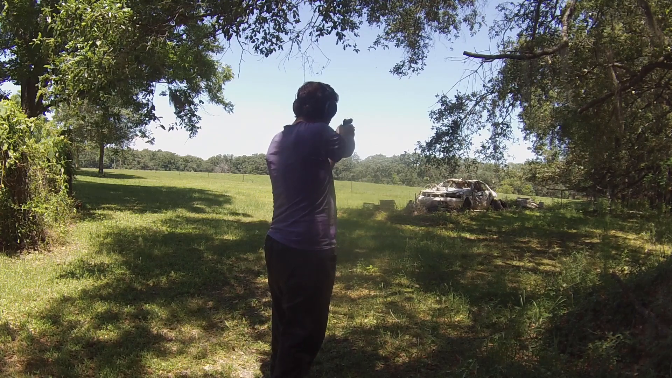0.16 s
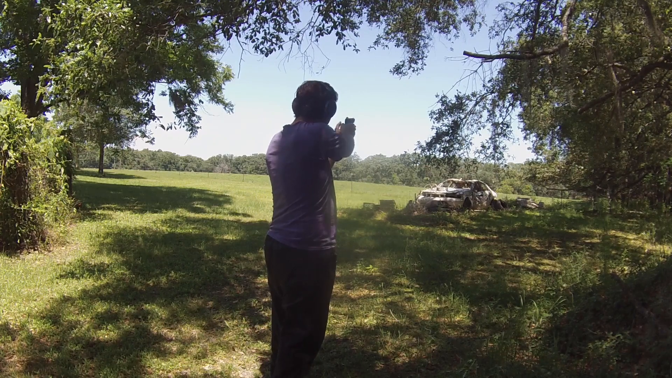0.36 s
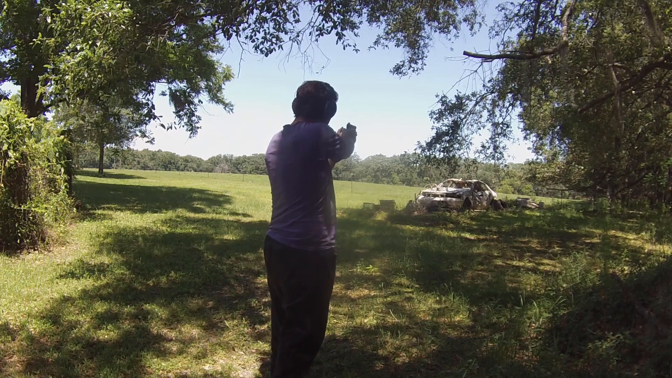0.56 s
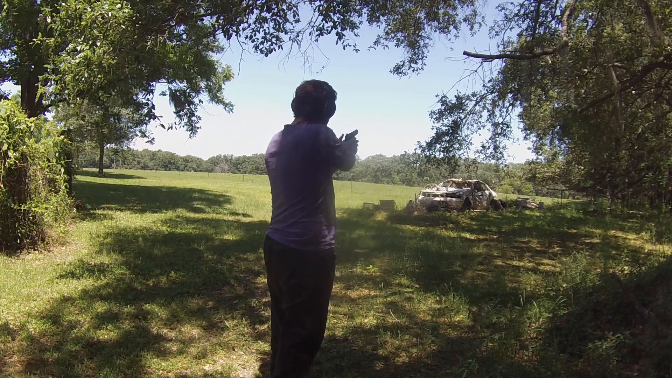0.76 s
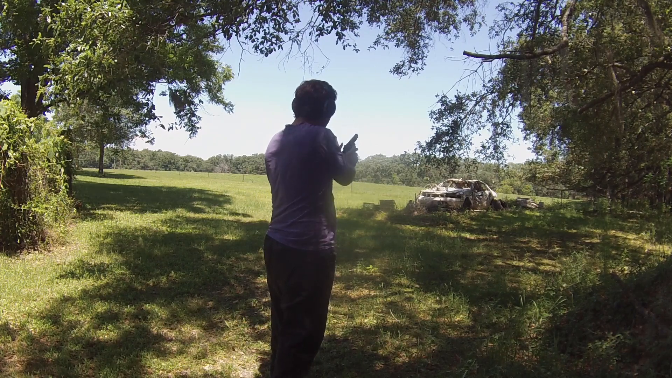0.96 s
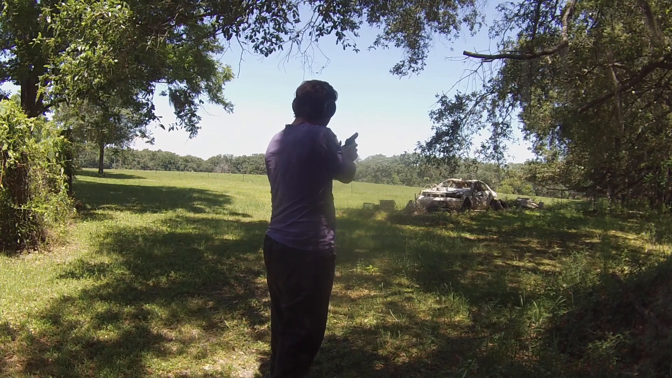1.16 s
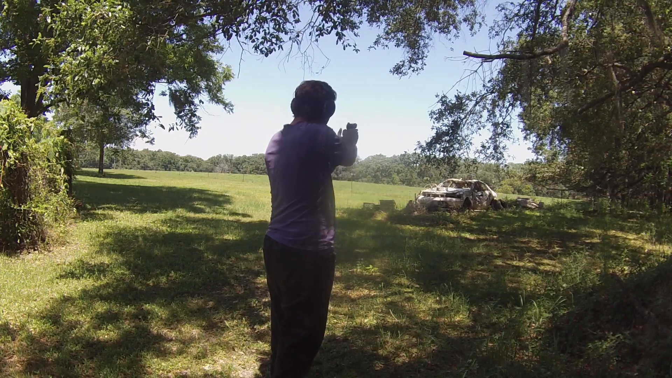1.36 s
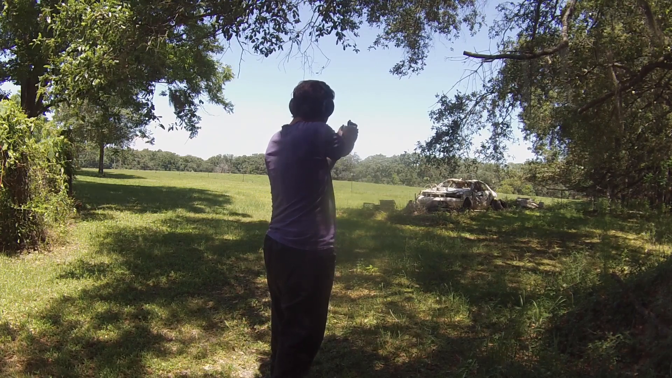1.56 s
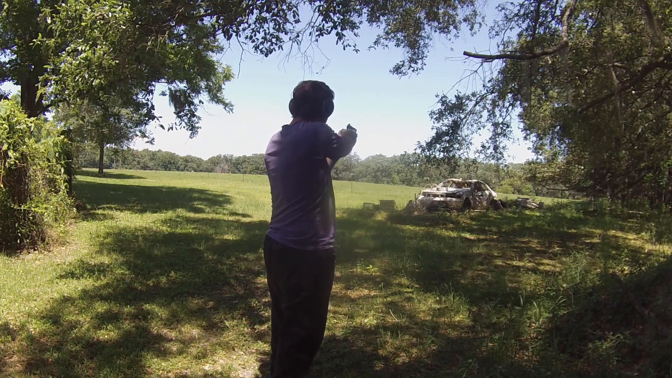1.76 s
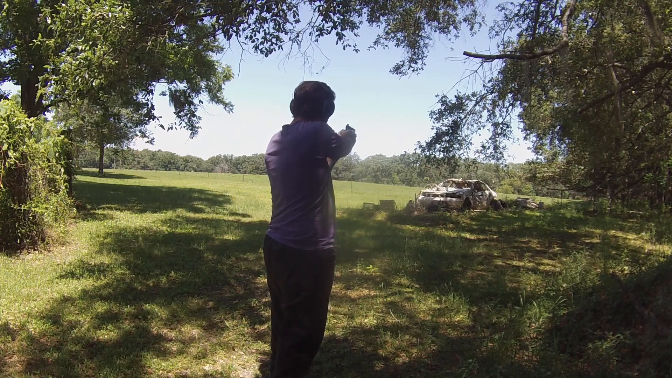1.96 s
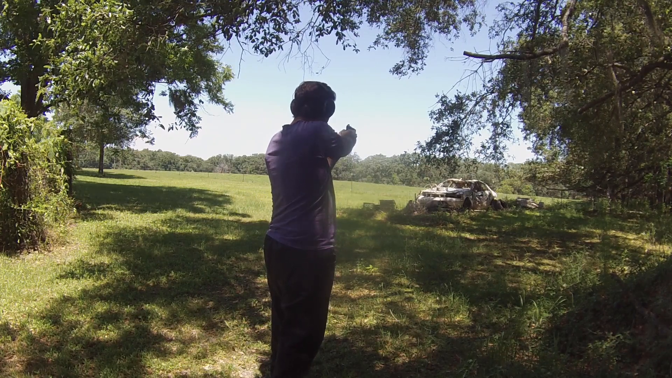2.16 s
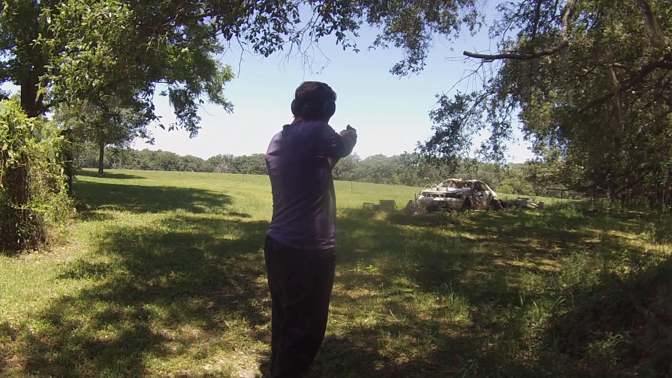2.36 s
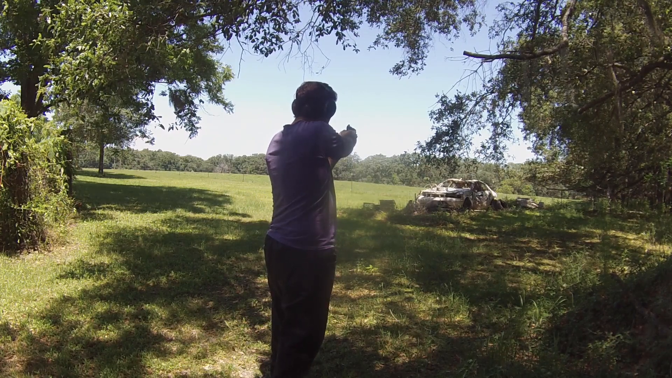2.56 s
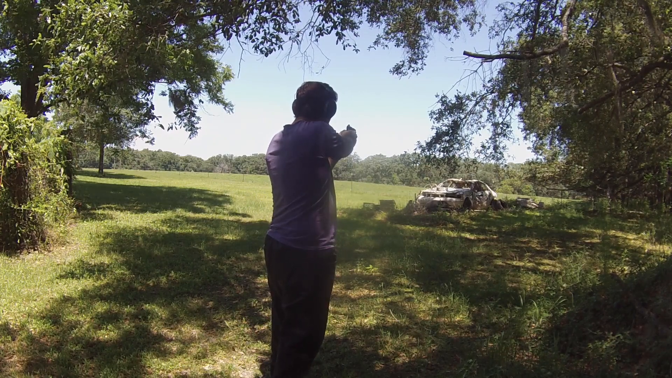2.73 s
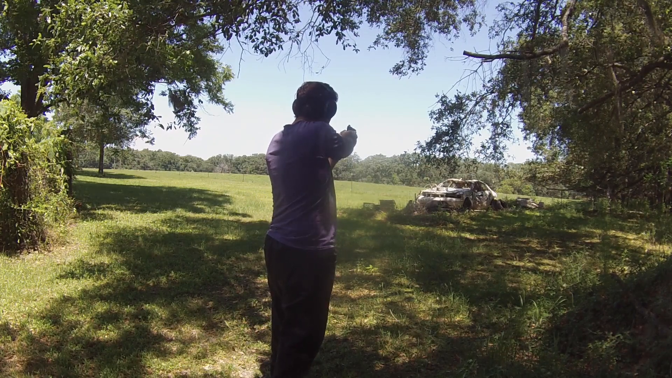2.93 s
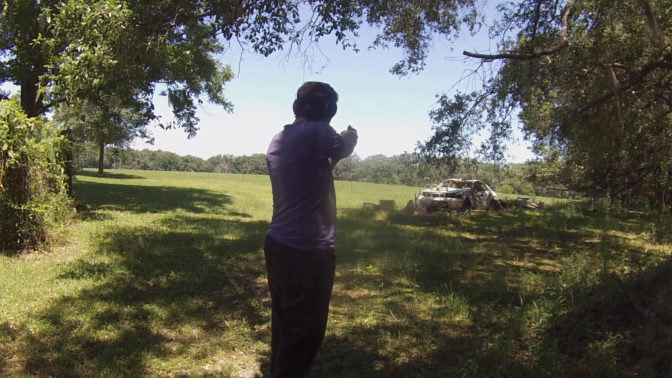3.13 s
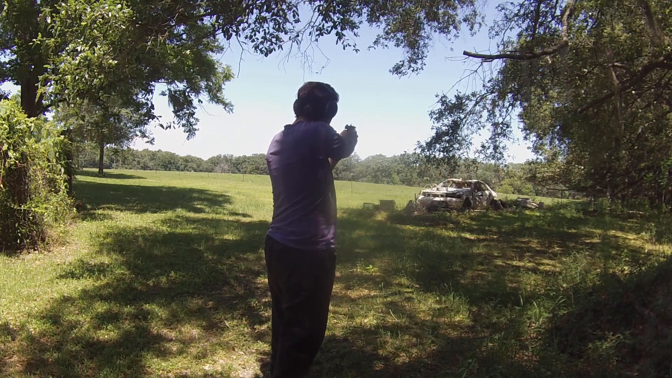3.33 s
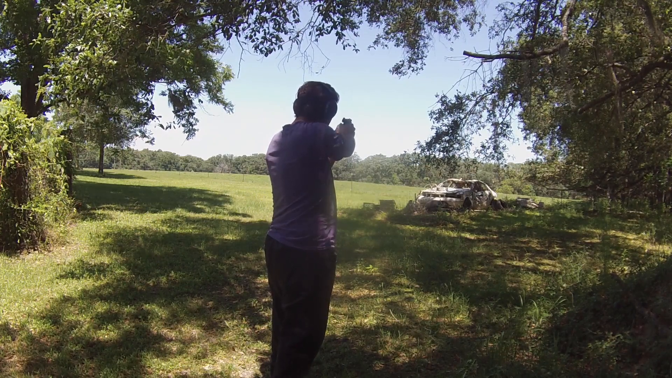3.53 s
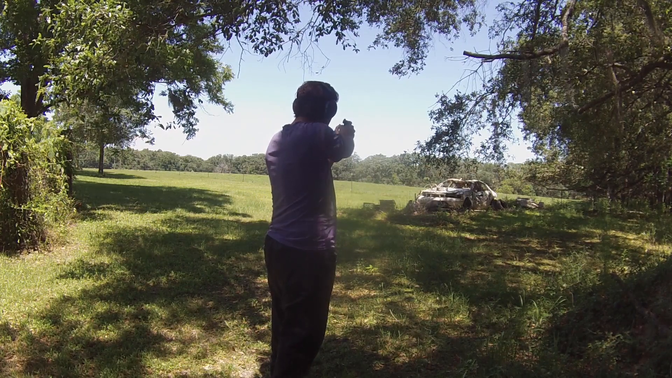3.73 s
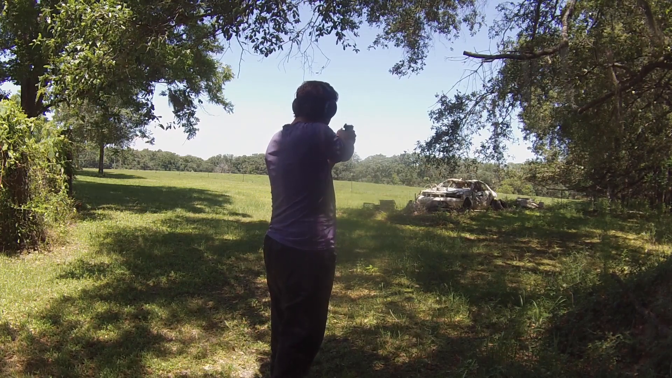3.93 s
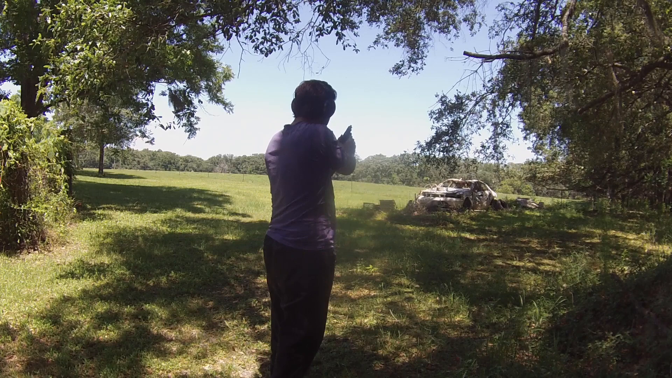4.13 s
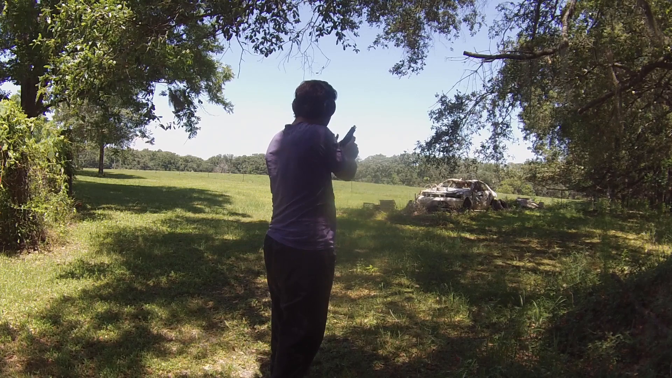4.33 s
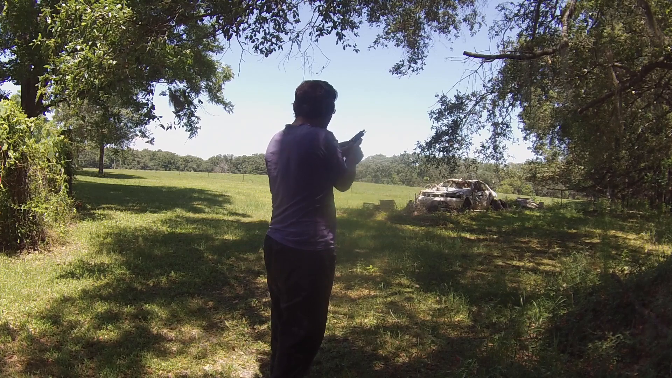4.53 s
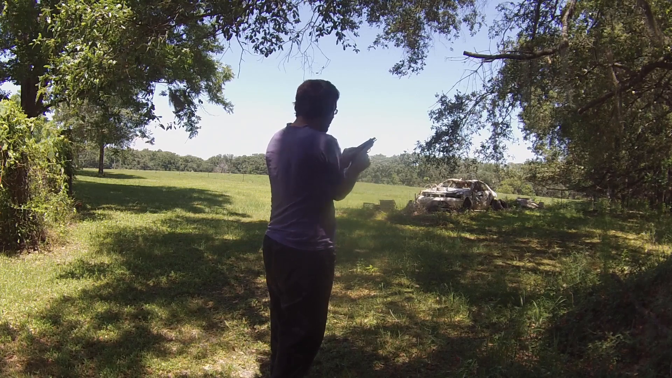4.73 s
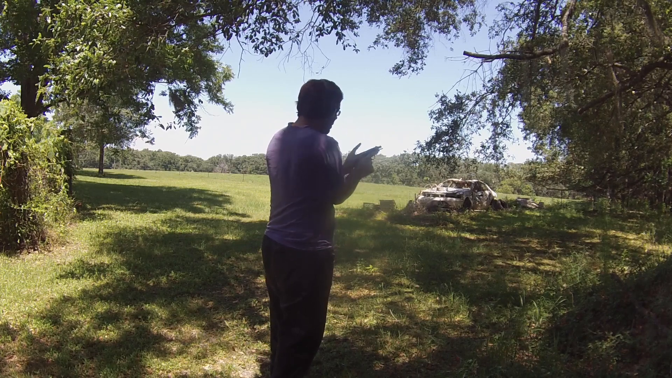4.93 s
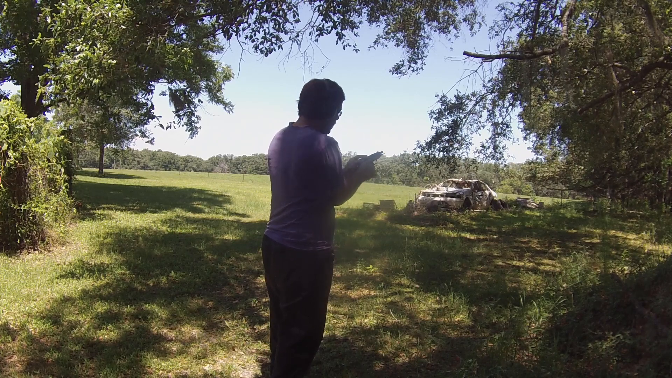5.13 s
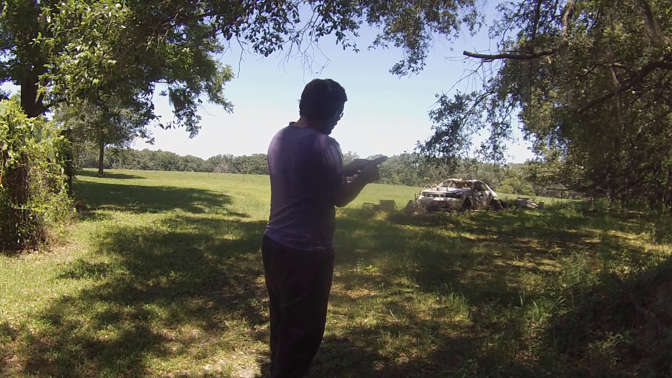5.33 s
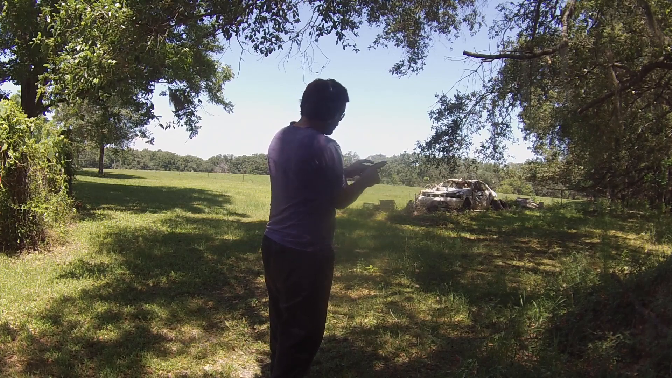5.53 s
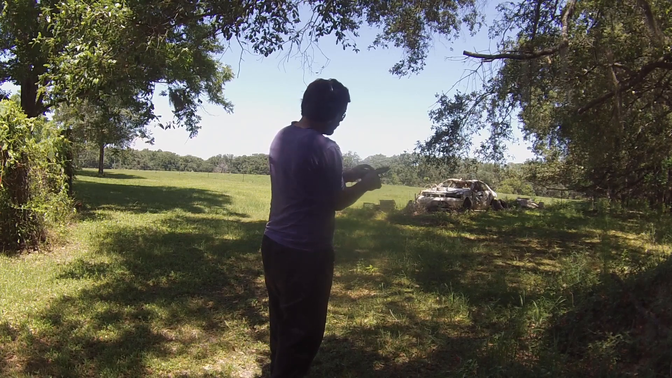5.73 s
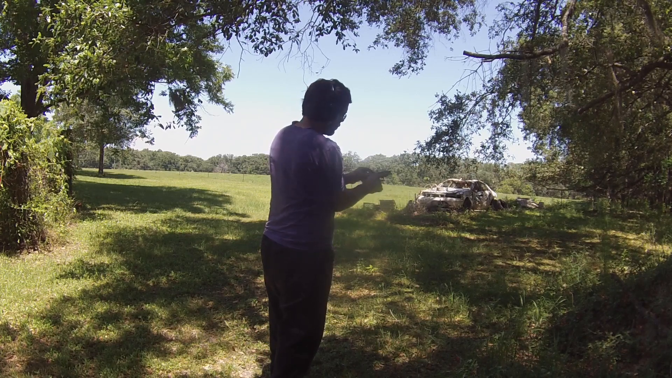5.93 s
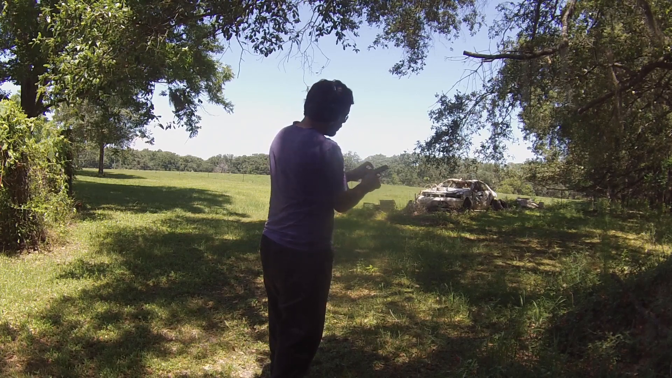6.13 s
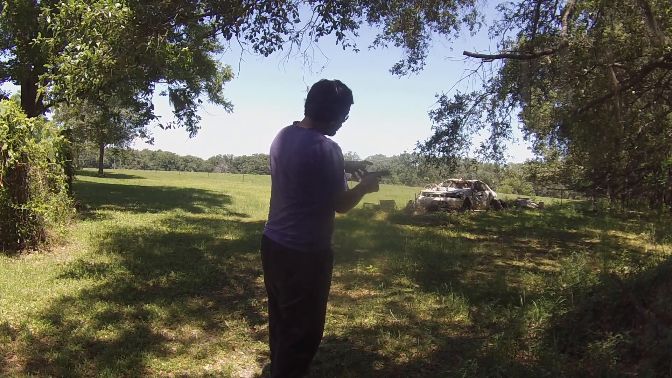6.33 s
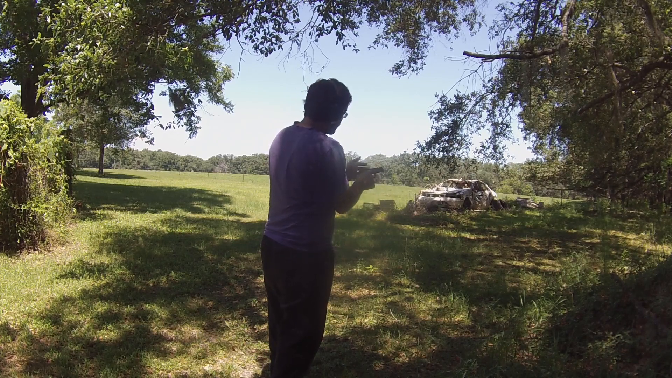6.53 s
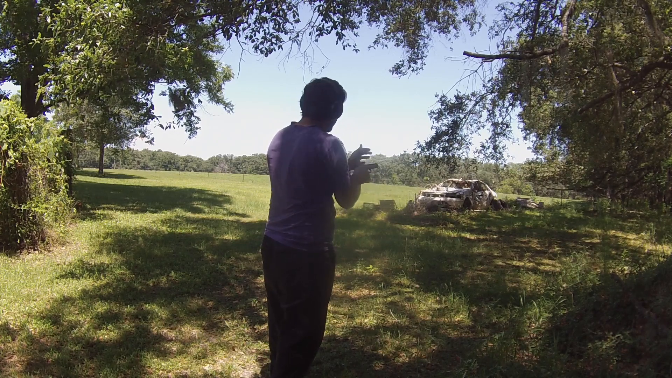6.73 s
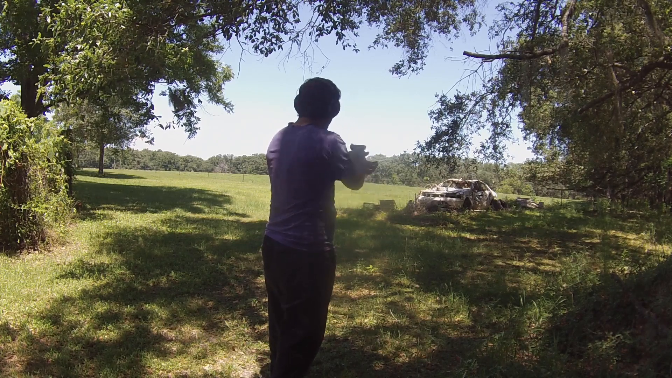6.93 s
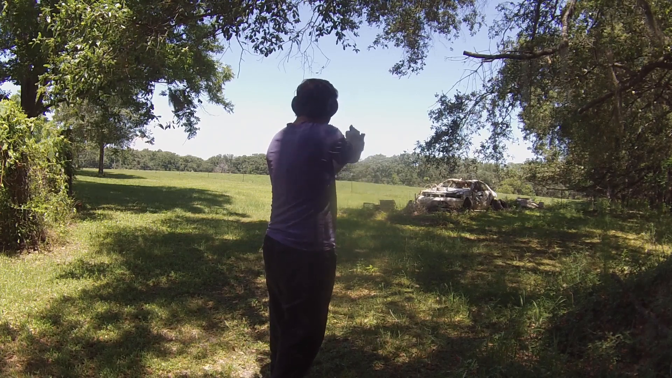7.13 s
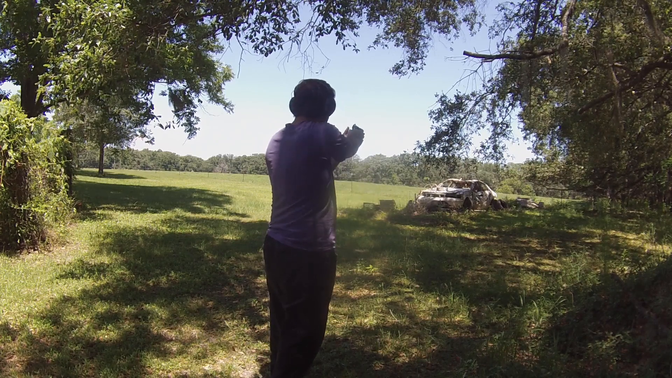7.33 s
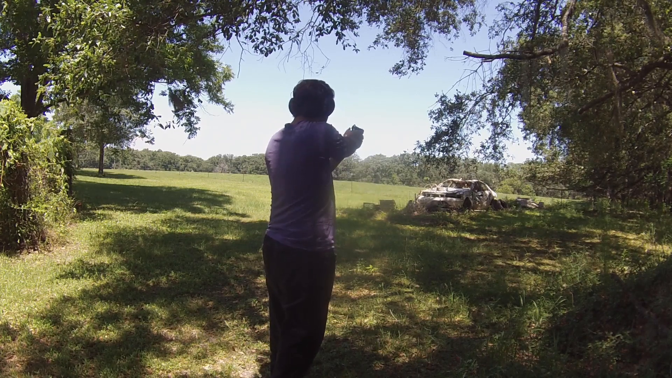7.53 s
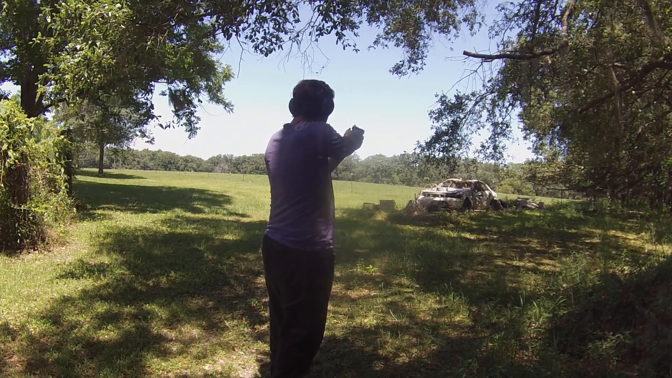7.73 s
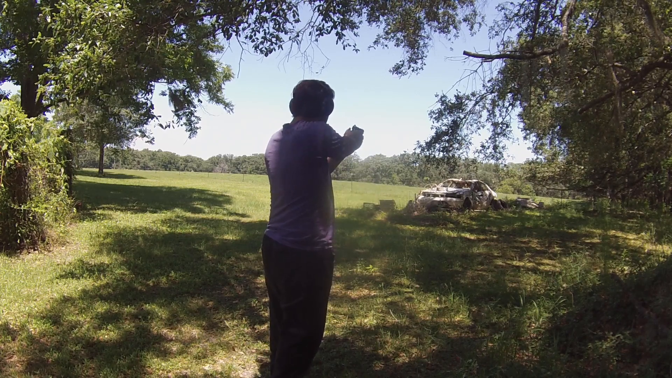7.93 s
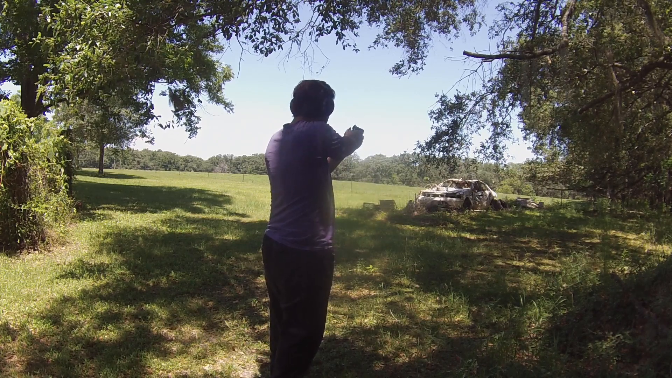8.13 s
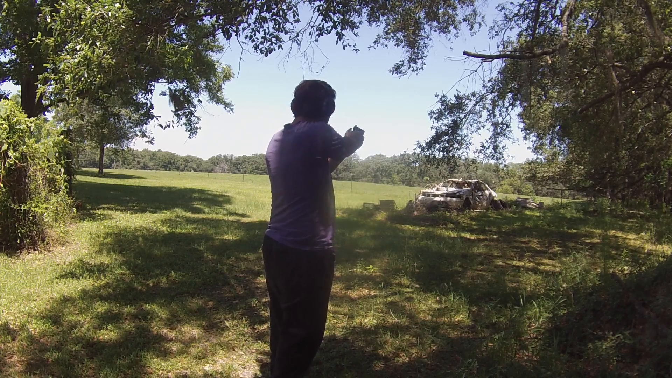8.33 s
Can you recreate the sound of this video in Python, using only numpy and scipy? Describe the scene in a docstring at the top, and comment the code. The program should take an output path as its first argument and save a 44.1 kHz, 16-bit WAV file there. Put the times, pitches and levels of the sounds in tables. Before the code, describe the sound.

Open field edge under trees, close microphone, nearly mono. Two single handgun shots, at the start and about three seconds later, each a saturated bang with heavy low push, quick leafy splashes and a long woodland roll. A dry click sounds between them; after the second come a firm double click and later a cluster of metal clacks. Soft wind buffets drop away, leaving quiet air, thin insect buzz and tiny high bird notes.

```python
"""Edge of a field, under trees: two pistol shots a few metres from a microphone whose inputs they overload.
Each shot is a noise crack plus a huge pressure push; leaves and trunks scatter it back as shaped noise, then
the woods around the field roll on, ever duller. The gun clicks, as damped noise, when handled. Narrow noise
makes the insects, brief wavering sines the thin high tones, a wandering sine the far motor; low noise in gusts
is light wind bumping the microphone."""
import sys
import numpy as np
from scipy import signal
from scipy.fft import rfft, irfft, next_fast_len
from scipy.io import wavfile
from scipy.ndimage import map_coordinates

SR = 44100
rng = np.random.default_rng(int(sys.argv[2]) if len(sys.argv) > 2 else 0)


def file_out(sig):
    """Save sig as 16-bit WAV at sys.argv[1]."""
    # one column per channel
    cols = np.atleast_2d(sig).T
    # limit, then scale
    lim = np.clip(cols, -1, 1)
    pcm = np.round(lim * 32767).astype(np.int16)
    wavfile.write(sys.argv[1], SR, pcm)


N = 369558


def amp(db):
    """Decibels to gain."""
    return 10 ** (np.asarray(db) / 20)


def unit(x):
    """Scale to rms 1."""
    return x / np.sqrt(np.mean(x ** 2) + 1e-20)


def along(points, hz):
    """Read (frequency [Hz], value) points on a log-frequency axis."""
    f, v = np.transpose(points)
    return np.interp(np.log(hz + 1), np.log(f + 1), v)


def filtered(x, response):
    """Multiply the spectrum of x by a response of frequency [Hz]."""
    n = x.shape[-1]
    padded = next_fast_len(n + 8192)
    spectrum = rfft(x, padded) * response(np.fft.rfftfreq(padded, 1 / SR))
    return irfft(spectrum, padded)[..., :n]


def noise(colour, n):
    """Noise of rms 1, coloured by a (frequency [Hz], level [dB]) table."""
    return unit(filtered(rng.standard_normal(n), lambda f: amp(along(colour, f))))


def band(hz, width_hz):
    """Narrow noise of rms 1, 3.5 dB down at width_hz either side of the centre."""
    return unit(filtered(rng.standard_normal(N), lambda f: 1 / (1 + ((f - hz) / width_hz) ** 2 / 2)))


def wobble(knots_per_s, n=N):
    """Smooth random curve through normally distributed knots."""
    knots = rng.standard_normal(N // 8)
    return map_coordinates(knots, [np.arange(n) * knots_per_s / SR], mode="mirror")


def lobe(t, start_s, length_s):
    """Half a sine, zero elsewhere."""
    return np.abs(np.sin(np.pi * np.clip((t - start_s) / length_s, 0, 1)))


def bump(t, centre_s, spread_s):
    """Bell-shaped swell; spread_s is its standard deviation."""
    return np.exp(-.5 * ((t - centre_s) / spread_s) ** 2)


def add(track, s, sound):
    """Mix a sound in at time s."""
    place = track[max(round(s * SR), 0):][:len(sound)]
    place += sound[:len(place)]


# open-air colour: (frequency [Hz], level [dB])
AIR_COLOUR = [(12, -11), (22, -0.5), (60, -4.5), (110, -10.5), (270, -16), (500, -19.5), (900, -24.5),
              (1800, -28), (4000, -34), (8500, -41.5), (10500, -41.5), (11500, -45.5), (13000, -48.5),
              (15500, -59)]


def field(air_db=-54.0, hum_hz=87, hum_db=-60):
    """Open-air noise plus a far motor: a sine of wandering pitch and level."""
    pitch_hz = hum_hz + 1.8 * wobble(4)
    tone = unit(np.sin(2 * np.pi * np.cumsum(pitch_hz) / SR))
    hum = amp(hum_db + 1.1 * wobble(2)) * tone
    return amp(air_db) * noise(AIR_COLOUR, N) + hum


# steady insects: (centre [Hz], width either side [Hz], rms level [dB])
INSECT_CHORUS = [(6800, 370, -83.5), (9690, 230, -77), (10546, 200, -87.5)]
# bouts of the nearer insect: (start [s], end [s], level at mid-bout [dB])
INSECT_BOUTS = [(.65, 1.202, -76), (1.649, 2.4, -74), (2.9, 3.5, -74.5), (4.88, 5.418, -73)]
# thin high tones: (start [s], end [s], pitch [Hz], peak level [dB])
HIGH_TONES = [(4.36, 4.46, 6520, -71), (4.56, 4.65, 6540, -68), (1.552, 1.605, 9950, -66.5)]


def wildlife(t, buzz_hz=7230, buzz_width_hz=200, waver_hz=20):
    """Steady insect bands, a nearer insect buzzing in bouts, and thin high tones as wavering sines."""
    chorus = sum(amp(db) * band(hz, width_hz) for hz, width_hz, db in INSECT_CHORUS)
    bouts = sum(amp(db) * np.sqrt(lobe(t, start, end - start)) for start, end, db in INSECT_BOUTS)
    buzz = band(buzz_hz, buzz_width_hz) * bouts
    waver_cycles = np.cumsum(wobble(60)) * waver_hz / SR
    tones = 0
    for start, end, hz, db in HIGH_TONES:
        tone = np.sin(2 * np.pi * (hz * t + waver_cycles))
        tones = tones + amp(db) * lobe(t, start, end - start) * tone
    return chorus + buzz + tones


# wind colour at the microphone: (frequency [Hz], level [dB])
BUFFET_COLOUR = [(8, -10.5), (20, 1), (35, 0.5), (55, -4), (90, -19), (160, -33), (400, -66), (1500, -120)]
# gusts, level before flutter: (peak time [s], length [s], level [dB])
WIND_GUSTS = [(.8, .5, -39), (1.131, .18, -34), (1.34, .24, -42.5), (2.267, .36, -41), (3.03, .95, -41.5),
              (4.04, .5, -33.5), (7.28, .14, -49)]
BREEZE_DB, LULL_DB = -50.5, -62
DROP_S, DROP_LENGTH_S = 4.2, 0.28


def wind(t, flutter_db=2.5, flutter_knots_per_s=11):
    """Light breeze that drops to a lull; gusts swell on top of it, and eddies make it flutter."""
    breeze = amp(np.interp(t, [DROP_S, DROP_S + DROP_LENGTH_S], [BREEZE_DB, LULL_DB]))
    gusts = sum(amp(db) * lobe(t, s - length_s / 2, length_s) for s, length_s, db in WIND_GUSTS)
    flutter = amp(flutter_db * wobble(flutter_knots_per_s))
    return np.hypot(breeze, gusts) * flutter * noise(BUFFET_COLOUR, N)


# resonances of the gun's frame: (centre [Hz], width [Hz], boost [dB])
FRAME_MODES = [(2050, 250, 5.5), (3050, 610, 4.5), (4400, 500, 3), (5600, 500, 2), (6850, 550, 3.5),
               (9800, 1300, 1)]
# colour of the grip's knock: (frequency [Hz], level [dB])
GRIP_COLOUR = [(200, -21), (600, -7), (850, 0.5), (1200, -6), (1800, -21.5), (4000, -43.5)]
# colour of the clicks' scatter in the leaves: (frequency [Hz], gain [dB])
LEAF_COLOUR = [(500, -11.5), (2500, -9), (4500, 1), (6500, 2.5), (10000, 2.5), (15000, 4.5)]


def click(db, hz, q, t60_s, knock_db, attack_s=.0003, leaves_db=-19, leaves_t60_s=0.25,
          soft_hz=11500, small_hz=900):
    """Steel parts snap in a hand that damps them; the leaves overhead add a short hiss."""
    t = np.arange(SR // 3) / SR

    def colour(f):
        boost_db = sum(gain_db / (1 + (2 * (f - mode_hz) / width_hz) ** 2)
                       for mode_hz, width_hz, gain_db in FRAME_MODES)
        # small parts radiate no bass, and the contact time limits the treble
        bass_limit = 1 / np.hypot(1, (small_hz / (f + 1)) ** 2)
        treble_limit = 1 / np.hypot(1, (f / soft_hz) ** 4)
        resonance = 1 / np.hypot(1, q * (f / hz - hz / (f + 1)))
        return amp(boost_db) * bass_limit * treble_limit * resonance

    snap, scatter = unit(filtered(rng.standard_normal((2, len(t))), colour))
    knock = amp(knock_db) * noise(GRIP_COLOUR, len(t))
    contact = (snap + knock) * amp(-60 * t / t60_s) * (1 - np.exp(-t / attack_s))
    hiss = filtered(scatter, lambda f: amp(along(LEAF_COLOUR, f)))
    hiss = hiss * amp(leaves_db - 60 * t / leaves_t60_s) * np.minimum(t / .004, 1)
    return amp(db) * (1.2 * contact + 0.63 * hiss)


# shots: (blast time [s], blast gain [dB], echo gain [dB], pressure push length [s],
#         trigger break to blast [s])
PISTOL_SHOTS = [(0.105, 2, -0.5, .00295, .0232), (3.3923, 2.5, -0.5, .00295, .0288)]
# handling: (time [s], gain [dB], centre [Hz], sharpness [Q], decay t60 [s],
#            grip knock re snap [dB])
HANDLING_CLICKS = [(1.3708, -48, 4970, .6, .008, -12), (1.3799, -30, 4400, 0.27, 0.0084, -7),
                   (1.3799, -29, 5600, 10, 0.0095, -30), (4.6313, -27.5, 2300, 0.6, 0.017, -6),
                   (4.635, -26, 5000, 0.9, 0.011, -14.5), (5.2272, -43.5, 3400, .45, 0.026, -10),
                   (6.1724, -43, 4000, .6, 0.03, -15), (6.181, -29, 3900, 1.5, 0.026, -22),
                   (6.188, -38, 3500, .5, 0.031, -14), (6.195, -28.5, 3000, 1.4, 0.024, -30),
                   (6.204, -27.5, 3600, 0.67, 0.015, -24), (6.694, -48.5, 2500, 2.4, 0.031, 1)]
# trigger creep, break, strike on the primer, each:
# (gain [dB], centre [Hz], sharpness [Q], decay t60 [s], grip knock re snap [dB])
TRIGGER_CREEP = (-54, 4000, 1.16, 0.25, -17)
TRIGGER_BREAK = (-50.5, 4800, 1.2, .011, -11.5)
PRIMER_STRIKE = (-36, 3300, 0.6, 0.47, -18)
CREEP_LEAD_S, STRIKE_LEAD_S = .005, .003  # before the break, before the blast
TICK_LEAVES_DB = -28  # the hand shields creep and break from the leaves


def action():
    """The same three ticks lead into every shot; the gun is also handled at other times."""
    out = np.zeros(N)
    for blast_s, *_, lock_s in PISTOL_SHOTS:
        break_s = blast_s - lock_s
        add(out, break_s - CREEP_LEAD_S, click(*TRIGGER_CREEP, leaves_db=TICK_LEAVES_DB))
        add(out, break_s, click(*TRIGGER_BREAK, leaves_db=TICK_LEAVES_DB))
        add(out, blast_s - STRIKE_LEAD_S, click(*PRIMER_STRIKE))
    for s, *contact in HANDLING_CLICKS:
        add(out, s, click(*contact))
    return out


NEAR_DB, NEAR_FALL_DB_PER_S = -20.5, 120  # trees overhead
GROVE_DB = -25.5  # even scatter of the trees beyond
EDGE_S, EDGE_DB, SWELL_DB_PER_S = 0.4, -21, 42.5  # edge of the woods and the swell up to it
FALL_DB_PER_DOUBLING, DEPTH_S = 19.5, .66  # fall per doubling of 1 + (time past edge) / DEPTH_S


def returns(t):
    """Strength of the trees' answer: quick fall overhead, swell to the woods' edge, fall with depth."""
    near = amp(NEAR_DB - NEAR_FALL_DB_PER_S * t)
    edge = amp(EDGE_DB - SWELL_DB_PER_S * np.maximum(EDGE_S - t, 0))
    doublings = np.log2(1 + np.maximum(t - EDGE_S, 0) / DEPTH_S)
    return np.sqrt(near ** 2 + amp(GROVE_DB) ** 2 + edge ** 2) * amp(-FALL_DB_PER_DOUBLING * doublings)


# colour of the muzzle crack, also of the canopy splashes: (frequency [Hz], level [dB])
CRACK_COLOUR = [(100, -15), (350, -4.5), (700, -3.5), (1200, 2), (2000, -1.5), (3400, -1.5), (5600, -2.5),
                (7500, -9.5), (10000, -12), (15000, -20.5)]
# colour of the scattered sound before loss: (frequency [Hz], level [dB])
WOODS_COLOUR = [(40, -15), (160, -8.5), (280, -9), (430, -1), (650, 1.5), (950, 1), (1250, -1.5),
                (1700, -8), (2500, -11.5), (5500, -11), (7700, -12), (10500, -16.5), (15000, -23.5)]
# loss to soft ground (bass) and air (treble): (frequency [Hz], loss rate [dB/s])
PATH_LOSS = [(150, 7), (300, 9), (600, 0.5), (850, 0.04), (1200, 1.5), (1700, 4.5), (2500, 6.5), (3700, 20),
             (5500, 34), (7700, 49), (10500, 72.5), (14000, 108)]
# trunk echoes before loss: (delay [s], level [dB], spread [s])
TRUNK_ECHOES = [(0.038, -22, .004), (0.06, -19, .0018), (0.075, -19, 0.0012), (0.17, -16.5, 0.0014),
                (0.462, -21, 0.0015)]
# bright splashes from the tree crowns before loss: (delay [s], level [dB], spread [s])
CANOPY_SPLASHES = [(0.016, -19.5, 0.0033), (0.083, -23, 0.01), (0.462, -20, 0.002)]
# colour of the faint late answer from across the field: (frequency [Hz], level [dB])
FAR_COLOUR = [(800, -3), (1400, -11), (1950, 4.5), (2500, -9), (3100, -4), (4500, -20), (8000, -40)]


def woods(t, grain_db=1.2, grain_knots_per_s=900, clump_db=0.9, clump_knots_per_s=70,
          far_db=-61, far_s=1.696, far_spread_s=0.098):
    """Countless reflections of uneven size, in clumps; the later, the more air and ground dull them."""
    n = len(t)
    sizes = amp(grain_db * wobble(grain_knots_per_s, n) + clump_db * wobble(clump_knots_per_s, n))
    trunks = sum(amp(db) * bump(t, delay_s, spread_s) for delay_s, db, spread_s in TRUNK_ECHOES)
    crowns = sum(amp(db) * bump(t, delay_s, spread_s) for delay_s, db, spread_s in CANOPY_SPLASHES)
    back = sizes * noise(WOODS_COLOUR, n) * returns(t)
    back = back + noise(WOODS_COLOUR, n) * trunks
    back = back + noise(CRACK_COLOUR, n) * crowns
    # loss grows with delay, band by band
    hz, delay_s, bins = signal.stft(back, SR, nperseg=512)
    loss_db = along(PATH_LOSS, hz)[:, None] * delay_s
    roll = signal.istft(bins * amp(-loss_db), SR, nperseg=512)[1][:n]
    far = amp(far_db) * bump(t, far_s, far_spread_s) * noise(FAR_COLOUR, n)
    return roll * np.minimum(t / .005, 1) + far


def muzzle(t, push_s, crack_db=-4, rise_s=.0011, hold_s=0.0045, fall_s=0.0036, push_db=19, lag_s=.0023,
           rebound_db=0, rebound_s=0.00089, swing_db=-21, swing_s=.0135, swing_spread_s=.004):
    """A crack swells in about a millisecond; the gas gives a huge push, short rebound, slow swing back."""
    swell = np.minimum(t / rise_s, 1) ** 2 * np.exp(-np.maximum(t - hold_s, 0) / fall_s)
    crack = amp(crack_db) * swell * noise(CRACK_COLOUR, len(t))
    push = amp(push_db) * lobe(t, lag_s, push_s)
    rebound = amp(rebound_db) * lobe(t, lag_s + push_s, rebound_s)
    swing = amp(swing_db) * bump(t, swing_s, swing_spread_s)
    return crack - push + rebound + swing


def shots():
    """Each muzzle blast and its answer from the trees."""
    out = np.zeros(N)
    t = np.arange(3 * SR) / SR
    for blast_s, blast_db, echo_db, push_s, _ in PISTOL_SHOTS:
        add(out, blast_s, amp(blast_db) * muzzle(t, push_s) + amp(echo_db) * woods(t))
    return out


# hiss colour of each input stage: (frequency [Hz], level [dB])
HISS_COLOUR = [(60, -25), (250, -1), (5000, 0.5), (9000, -5), (11000, -22)]


def scene(hiss_db=-78):
    """All sources reach both channels alike; only the faint input hiss differs."""
    t = np.arange(N) / SR
    mid = field() + wildlife(t) + wind(t) + action() + shots()
    hiss = amp(hiss_db) * np.array([noise(HISS_COLOUR, N), noise(HISS_COLOUR, N)])
    return mid + hiss


TOP_HZ = 15350  # middle of the 600 Hz wide upper band edge


def record(dry, coupling_hz=11, mismatch_db=0.16):
    """Inputs saturate at slightly unlike levels, coupling capacitors sag and recover, converter clips."""
    ceiling = amp([[mismatch_db], [-mismatch_db]])
    overloaded = dry / (1 + np.abs(dry / ceiling) ** 4) ** (1 / 4)
    coupled = filtered(overloaded, lambda f: 1j * f / (coupling_hz + 1j * f))
    clipped = np.clip(coupled, -1, 1)
    return filtered(clipped, lambda f: np.clip((TOP_HZ - f) / 600 + .5, 0, 1))


dry = scene()
out = record(dry)
file_out(out)
```